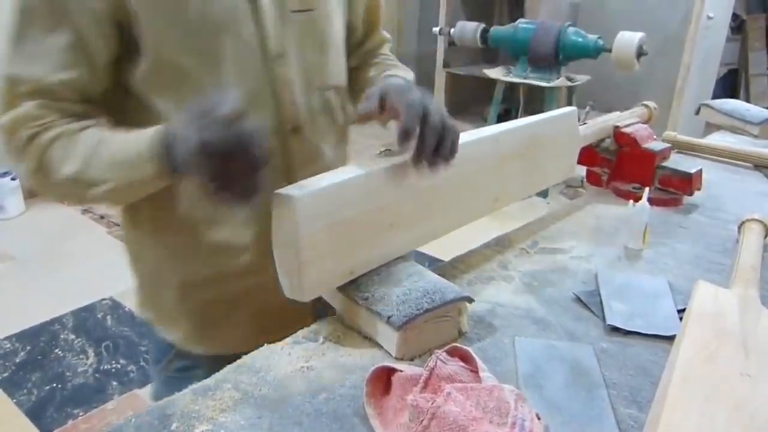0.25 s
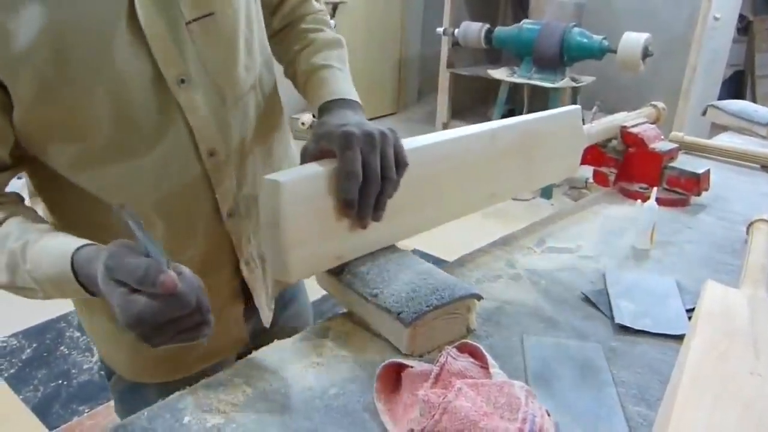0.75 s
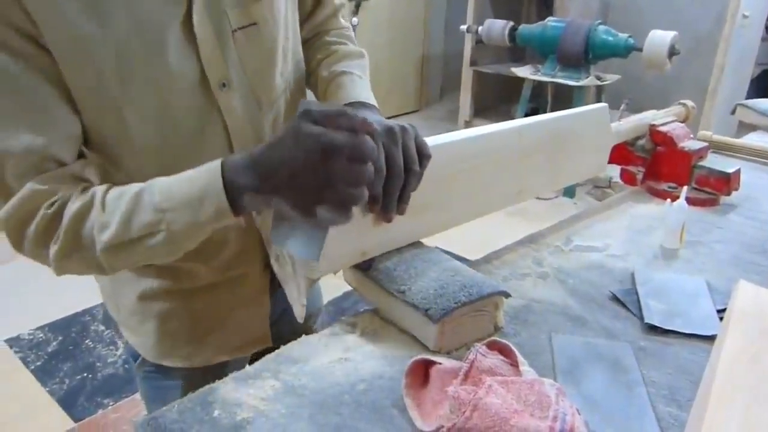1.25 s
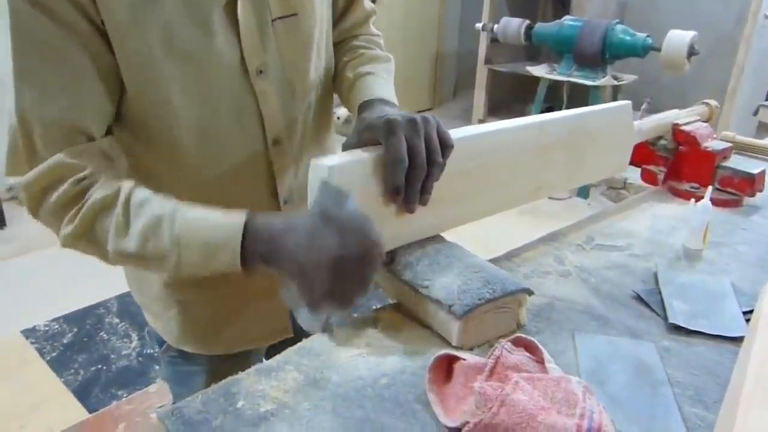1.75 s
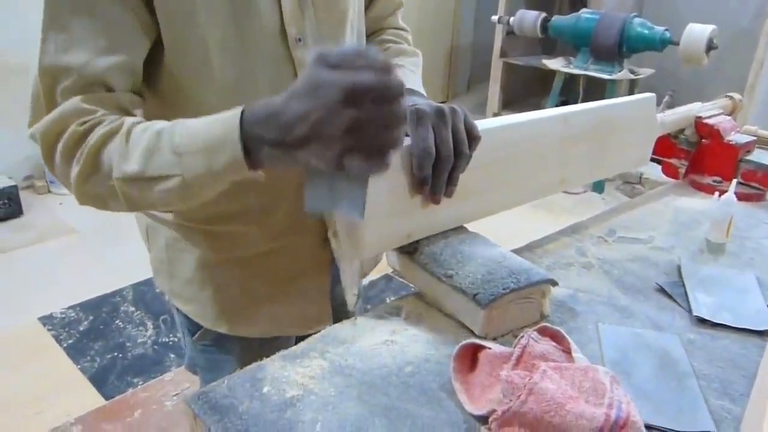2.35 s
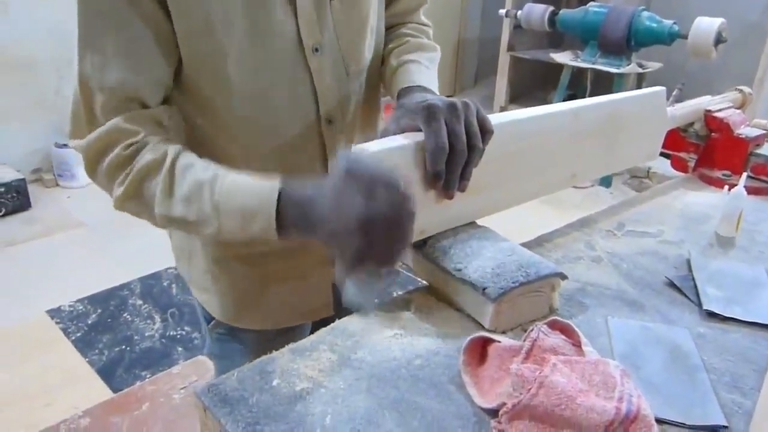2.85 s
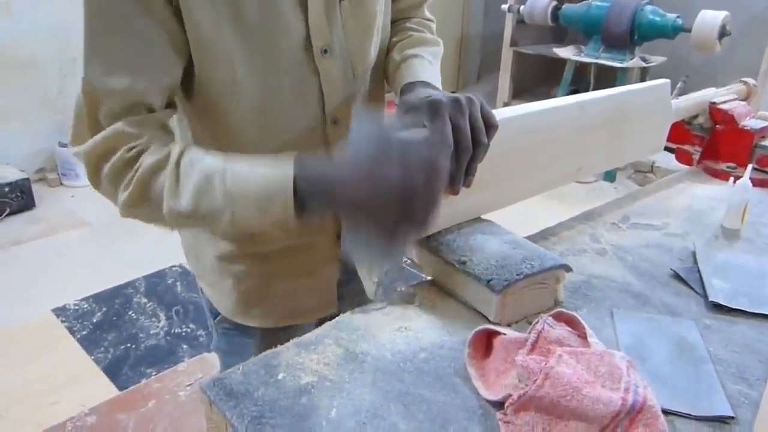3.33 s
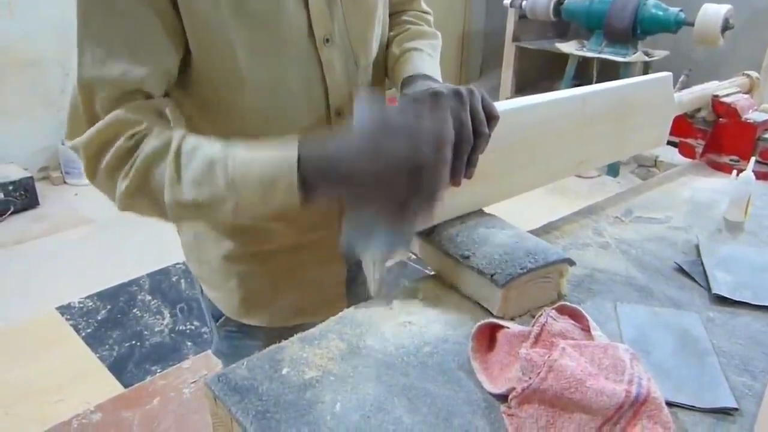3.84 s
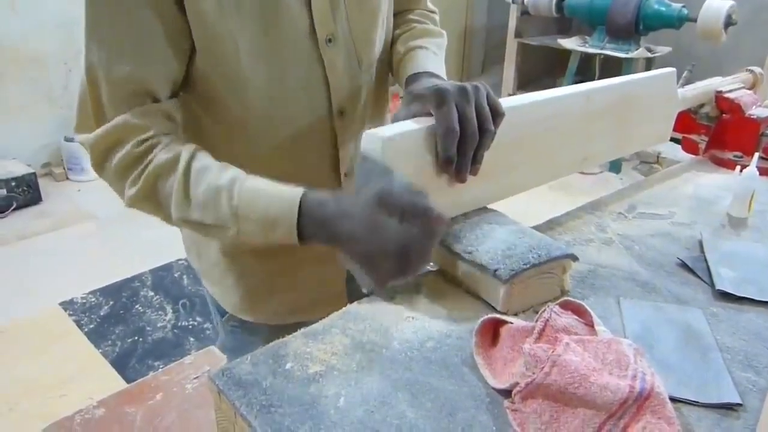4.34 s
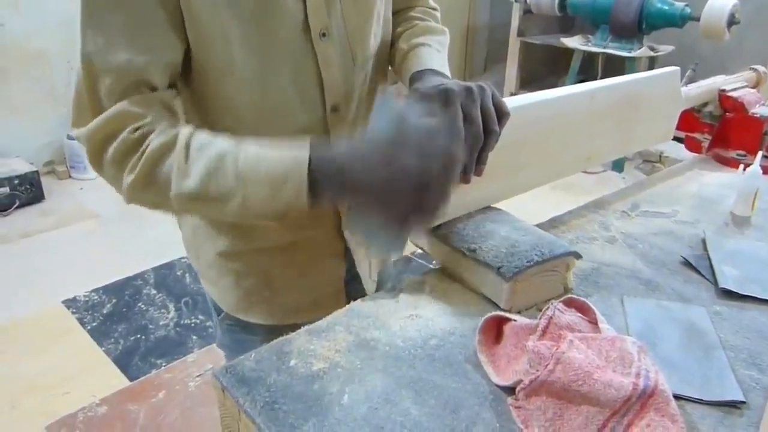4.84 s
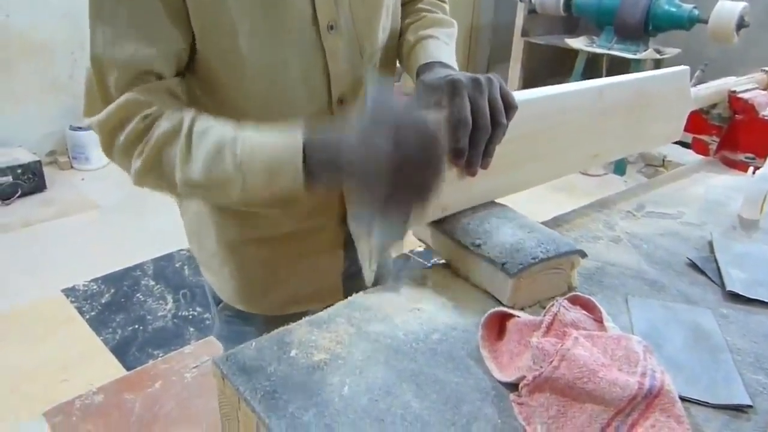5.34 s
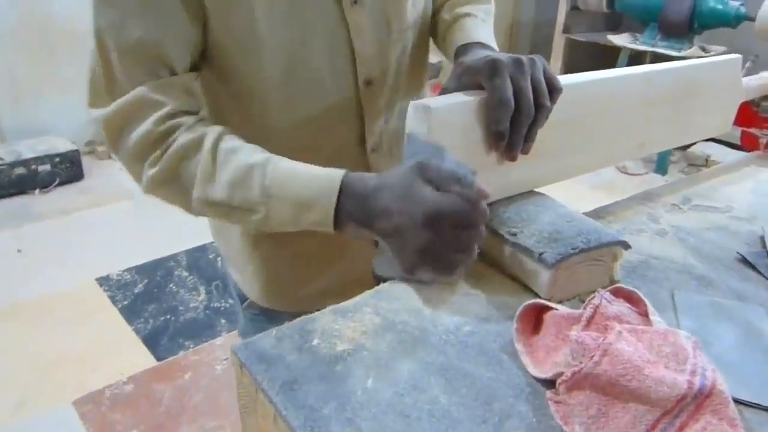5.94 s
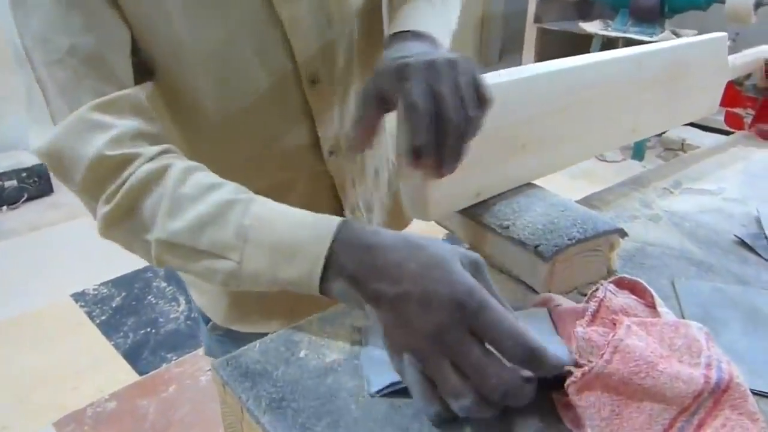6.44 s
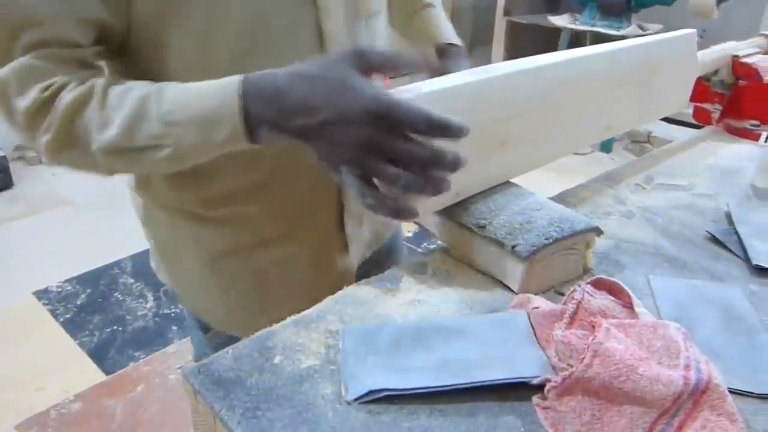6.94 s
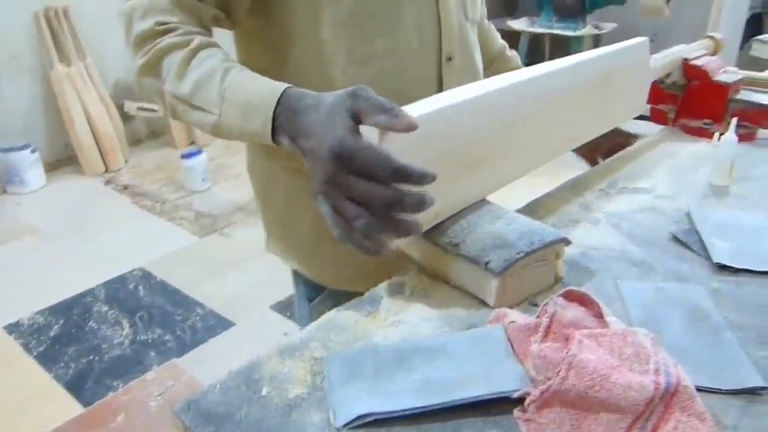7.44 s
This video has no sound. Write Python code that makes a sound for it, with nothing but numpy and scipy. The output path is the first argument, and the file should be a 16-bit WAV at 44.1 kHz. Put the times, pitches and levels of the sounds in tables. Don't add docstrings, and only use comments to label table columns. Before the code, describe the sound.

The first half second is silent, then the sound begins abruptly with sanding already under way. Until about 3.5 s, sandpaper rubs a wooden blade in rapid, uneven strokes, roughly six a second, close up: bright fine hiss with a coarser scratch, and a hollow low drone from the wood. Sharp paper snaps and creases punctuate the turns, especially at 0.6, 1.25, 1.5, 2.4 and 3.0 s. From 3.6 s the strokes are smoother, generally softer and more spaced, about five a second. A dry slat clicks down with small taps at 5.2 s. Timber is knocked further off from 5.5 s, with strong hollow clunks at 5.85 and 6.0 s and a heavy, rattling bounce around 6.3-6.5 s. Lesser knocks follow at 6.95, 7.2 and 7.5 s as rubbing continues to the end. Machine hum, faint air hiss and a wavering deep motor rumble fill the reverberant workshop.

```python
import sys
import numpy as np
from scipy import signal
from scipy.fft import rfft, irfft
from scipy.io import wavfile

SR = 44100
rng = np.random.default_rng(int(sys.argv[2]) if len(sys.argv) > 2 else 0)


def output_pcm(signal):
    pcm = np.clip(np.atleast_2d(signal).T, -1, 1) * 32767
    wavfile.write(sys.argv[1], SR, np.round(pcm).astype(np.int16))


def volts_from_db(level):
    exponent = np.asarray(level, float) / 20
    return 10 ** exponent


N = 338688
START_S = 0.4765

# pitch_hz, level_db (per Hz)
GRIT_HISS = [(1760, -29), (3000, -11.5), (5230, -2), (6490, -2.5), (8220, -1.5), (10300, -2), (14700, -17),
             (15500, -23), (15800, -26)]
# pitch_hz, level_db (per Hz)
COARSE_SCRATCH = [(900, -23.5), (1400, -3), (2000, -5.5), (2800, 0.5), (3500, -1), (5000, -18)]


def sanding():
    fine, coarse, pan_db = strokes()
    hiss = coloured(grains(per_s=14000.0, spread_db=0.0), GRIT_HISS, patchy_db=1.5)
    scratch = coloured(grains(per_s=3000.0, spread_db=2.0), COARSE_SCRATCH, patchy_db=2.5)
    both = volts_from_db(3.5) * fine * hiss + volts_from_db(-2.0) * coarse * scratch
    return both * volts_from_db(np.outer([0.5, -0.5], pan_db))


# start_s, length_s, hiss_db, swell_db (start to end), scratch_db (over the hiss)
ROUGH_END_STROKES = [(0.424, 0.22, -35.5, 11.5, -5), (0.666, 0.16, -32.5, 8, -10),
                     (0.823, 0.12, -33.5, 5, 0), (0.952, 0.15, -34.5, 3, -8),
                     (1.074, 0.18, -33.0, 14, -5.5), (1.279, 0.16, -35.5, -8, -7.0),
                     (1.438, 0.12, -33, 4, -7), (1.538, 0.17, -34.5, 11, -4), (1.727, 0.26, -38, -8, -4.5),
                     (1.892, 0.13, -34, 1, -5.5), (2.02, 0.16, -35, -2.5, -5),
                     (2.157, 0.12, -33.0, 14, -3.5), (2.316, 0.14, -33.5, 7.5, -5),
                     (2.491, 0.1, -30, 3, -7.5), (2.634, 0.118, -30.5, 18, -6.5),
                     (2.74, 0.15, -33, 5.0, -5.5), (2.887, 0.18, -32.5, 14, -7),
                     (3.11, 0.283, -32.5, -3, -9), (3.377, 0.16, -35.5, 10.5, -3)]
SMOOTH_EDGE_STROKES = [(3.577, 0.21, -31.5, 7.5, -15.0), (3.99, 0.19, -40.5, 1, -10.0),
                       (4.19, 0.17, -34.5, 2.0, -18), (4.37, 0.21, -37.5, 1, -8.5),
                       (4.59, 0.177, -38.5, -2.5, -8), (4.785, 0.2, -37.5, 9, -6),
                       (5.023, 0.18, -38, -8.0, -3.5), (5.217, 0.16, -34.5, 11, -13),
                       (5.417, 0.14, -34.5, 3.5, -8), (5.594, 0.15, -35.5, 6, -9),
                       (5.762, 0.16, -40, 10, -11), (5.946, 0.13, -38.5, -7, -9),
                       (6.111, 0.2, -31.5, 3, -9.0), (6.322, 0.18, -39, 0, -23),
                       (6.51, 0.22, -34, -2.5, -5.5), (6.743, 0.15, -36.0, -0.5, -7.5),
                       (6.921, 0.18, -32.5, 5, -4.5), (7.119, 0.16, -35, -4.0, -9),
                       (7.298, 0.18, -32.0, 3.5, -9), (7.499, 0.15, -37, -1, -8.5),
                       (7.66, 0.12, -29.5, 14, -4)]


def strokes():
    echo_t60_s, echo_share, echo_pan_db = 0.42, 1.145, 0.6
    rough_pan_db, smooth_pan_db = (1.5, -1.5), -5.0
    power = np.zeros((2, N))
    for table, rise_s, fall_s in ((ROUGH_END_STROKES, 0.028, 0.053), (SMOOTH_EDGE_STROKES, 0.032, 0.047)):
        for start_s, length_s, hiss_db, swell_db, scratch_db in table:
            shape, gone = swell(start_s, length_s, rise_s, fall_s)
            hiss = shape * volts_from_db(hiss_db + swell_db * (gone - 0.5))
            power += (hiss * volts_from_db([[0], [scratch_db]])) ** 2
    decay = volts_from_db(-120 / (echo_t60_s * SR))
    lingering = signal.lfilter([1 - decay], [1, -decay], power + 1e-12)
    total = power + echo_share * lingering

    t, smooth_from_s = np.arange(N) / SR, SMOOTH_EDGE_STROKES[0][0]
    rough_hand_db = np.interp(t, [START_S, smooth_from_s], rough_pan_db)
    hand_db = np.where(t < smooth_from_s, rough_hand_db, smooth_pan_db)
    near = power[0] / total[0]
    return *np.sqrt(total), near * hand_db + (1 - near) * echo_pan_db


# start_s, peak_db, pitch_hz, bright_edge_db (over the peak), length_s
PAPER_SNAPS = [(0.592, -9, 2600, -3, 0.015), (0.696, -18.5, 2840, -13, 0.054),
               (0.848, -26, 730, -17, 0.011), (0.902, -19, 664, -16, 0.018), (.920, -14, 1700, -17, .006),
               (1.136, -37, 710, -26, 0.011), (1.234, -13.5, 2850, -8, 0.026),
               (1.245, -10, 2470, -38, 0.016), (1.261, -24, 1150, -3, 0.034),
               (1.522, -10, 2620, -4.5, 0.018), (1.742, -29.5, 615, -29, 0.034),
               (2.125, -25, 670, -1, 0.017), (2.183, -18, 2070, -13, 0.034), (2.411, -15, 2120, -3, 0.02),
               (2.424, -18, 2860, -7, 0.034), (2.477, -21, 2120, -7, 0.037), (2.73, -19.5, 2500, -5, 0.035),
               (2.802, -21.5, 2470, -9, 0.026), (3.03, -12, 2420, -7, 0.027), (3.36, -15, 2270, -3, 0.025),
               (3.469, -19, 2300, -9, 0.034), (7.17, -14, 2820, -13, 0.0048),
               (3.128, -23, 2000, -17, 0.0093)]


def paper():
    out, t = np.zeros(N), np.arange(4000) / SR
    for start_s, peak_db, pitch_hz, edge_db, length_s in PAPER_SNAPS:
        scuff = (1 - np.exp(-t / (0.24 * length_s))) * np.exp(-3 * t / max(length_s, 0.002))
        crack = 4.04 * volts_from_db(0.49 * edge_db) * np.exp(-t / 0.00023)
        cracks = rng.standard_normal(len(t)) * rng.exponential(1, len(t)) * (scuff + crack)
        pitched = bandpass(cracks, pitch_hz / 1.26, pitch_hz * 1.304)
        pitched = pitched + 0.39 * bandpass(-cracks, pitch_hz / 2.68, pitch_hz / 1.7)
        edge = bandpass(cracks, 4000, 6000) + 0.32 * highpass(cracks, 6500, order=2)
        snap = pitched / abs(pitched).max() + volts_from_db(edge_db + 10.0) * edge / abs(edge).max()
        at = round(start_s * SR)
        out[at:at + len(t)] += volts_from_db(peak_db + 1.3) * snap
    return out


# pitch_hz, level_db (per Hz)
BLADE_BODY = [(180, -59), (300, 8), (409, -11), (480, -3.5), (589, 8.5), (803, -0.5), (1140, 0.5),
              (1950, -11.5), (2500, -15), (3250, -70), (5500, -120)]
# pitch_hz, width_hz, level_db
BLADE_TONES = [(221, 99, -26.5), (564, 67, -8.5), (125, 5.3, -15.5)]
# time_s, drone_db
HAND_PRESSURE = [(.5, -41), (1.1, -40), (1.6, -43), (2.5, -42), (3.4, -44), (3.7, -49.5), (4.0, -45),
                 (4.5, -47), (5.0, -46), (5.7, -48), (6.8, -43), (7.1, -44.5), (7.68, -47)]


def blade():
    (drone_db,), (rattle, _) = in_time(HAND_PRESSURE), rumble()
    sound = coloured(rng.standard_normal(N), BLADE_BODY, patchy_db=3.0)
    for pitch_hz, width_hz, level_db in BLADE_TONES:
        tone = ring(rng.standard_normal(N), pitch_hz, 2.2 / width_hz)
        sound = sound + volts_from_db(level_db) * rms_one(tone)
    shaken = np.hypot(volts_from_db(drone_db), rattle) * sound
    return highpass(shaken, 100, order=4)


# start_s, ring_peak_db, thud_db (over the ring), thud_hz, ring_hz
HARD_TIMBER = [
    (0.622, -40.5, 10.5, 250, 500),
    (1.189, -46.5, 16, 122.6, 910),
    (1.863, -39, 4.5, 130, 570),
    (5.806, -18.5, -5, 355.4, 770),
    (6.011, -9.5, -5.5, 206.6, 660),
    (6.311, -22, -5.5, 373, 700),
    (6.341, -20, -5.5, 179.6, 613),
    (6.371, -8.5, -9.5, 193, 482),
    (6.40, -35, -7, 133, 1250),
    (6.949, -21.5, -5.5, 195.3, 680),
]
PADDED_TIMBER = [
    (5.51, -27.5, 5.5, 310, 212),
    (5.512, -32.5, 8.5, 131.2, 700),
    (5.632, -38, 3.5, 341, 437),
    (5.849, -11, -12.5, 213, 666),
    (6.383, -13.5, -20, 320, 910),
    (6.509, -14.5, -12.5, 324.7, 870),
    (7.174, -26.5, 1, 365.8, 580),
    (7.54, -32, 0, 199, 700),
]


def knocks():
    crack_db = {"hard": 0, "padded": -18}
    rise_s = 0.0061
    out, t = np.zeros(N), np.arange(SR // 2) / SR
    crowd_hz = np.geomspace(200, 4200, 30)
    blows = [row + (crack_db["hard"],) for row in HARD_TIMBER]
    blows += [row + (crack_db["padded"],) for row in PADDED_TIMBER]
    for start_s, peak_db, thud_db, thud_hz, ring_hz, high_db in sorted(blows):
        chance = rng.standard_normal((3, len(crowd_hz) + 2))
        hz = np.append(crowd_hz * np.exp(0.024 * chance[0, 2:]), [thud_hz, ring_hz])
        slope_db = np.interp(np.log(hz), np.log([250, 460, 880, 1480]), [thud_db + 5.0, 0, 0, high_db])
        level_db = np.append(slope_db[:-2] - 13.5 + 2 * chance[1, 2:], [thud_db - 0.5, -2.5])
        t60_s = np.append(6.9 / crowd_hz ** 0.76, [0.22, 21.0 / ring_hz])[:, None]
        since = np.maximum(t - 0.00138 * abs(chance[2])[:, None], 0)
        build_up = 1 - np.exp(-since * (hz[:, None] / 200) ** 2 / rise_s)
        modes = np.sin(2 * np.pi * hz[:, None] * since) * build_up * volts_from_db(1.0 - 60 * since / t60_s)
        blow = volts_from_db(level_db) @ modes
        at = round(start_s * SR)
        out[at:at + len(t)] += volts_from_db(peak_db) * blow[:N - at]
    return highpass(out, 112, order=6)


# start_s, peak_db
TAPS = [
    (5.173, -19),
    (5.194, -26.5),
    (5.234, -28),
]
# pitch_hz, level_db, t60_s (time to fall 60 dB)
SLAT_MODES = [(362, -3.5, 0.034), (490, -14, 0.045), (615, -6, 0.12), (700, -0.5, 0.026), (910, -3.5, .03),
              (1250, -4.5, .02), (1540, -1.5, .02), (2000, -3, 0.022), (2600, -13, 0.01), (2900, -1, 0.016),
              (3460, -2, 0.01)]


def slat():
    t, chatter_s = np.arange(N) / SR, 0.011
    force = np.zeros(N)
    for start_s, peak_db in TAPS:
        force += volts_from_db(peak_db - 25.0) * (t >= start_s) * np.exp(-np.maximum(t - start_s, 0) / chatter_s)
    body = np.zeros(N)
    for pitch_hz, level_db, t60_s in SLAT_MODES:
        contacts = force * grains(per_s=2100.0, spread_db=3.5)
        body += volts_from_db(level_db) * ring(contacts, pitch_hz, t60_s)
    return highpass(body, 280, order=2)


# start_s, length_s, body_db, boom_db
TIMBER_RUMBLES = [
    (5.796, 0.2, -37.5, -35),
    (5.97, 0.47, -41, -36),
    (6.384, 0.28, -29.5, -53),
    (6.555, 0.22, -43, -33.5),
]


def rumble():
    power = np.zeros((2, N))
    for start_s, length_s, body_db, boom_db in TIMBER_RUMBLES:
        shape, _ = swell(start_s, length_s, rise=0.017, fall=0.13)
        power += (shape * volts_from_db([[body_db], [boom_db]])) ** 2
    return np.sqrt(power)


# pitch_hz, level_db (per Hz)
LOOSE_BUZZ = [(700, -8), (1000, 5), (1500, -2), (2200, -4), (3000, -24)]


def loose_pieces():
    rattle, _ = rumble()
    return volts_from_db(-4) * rattle * coloured(grains(per_s=1300.0, spread_db=4.5), LOOSE_BUZZ, patchy_db=2.0)


# pitch_hz, level_db (per Hz)
MACHINE_HUM = [(59, -52), (100, 0), (124, 16.5), (156, -10), (199, 12.5), (253, 6), (274, -18.5),
               (340, -1.5), (400, 19), (520, -48), (880, -120)]


def machine_hum():
    (drone_db,), (_, boom) = in_time(HAND_PRESSURE), rumble()
    hum_db = -49 + 0.76 * (drone_db - drone_db.mean())
    hum = coloured(rng.standard_normal(N), MACHINE_HUM, patchy_db=2.5)
    return highpass(np.hypot(volts_from_db(hum_db), boom) * hum, 100, order=4)


# pitch_hz, level_db (per Hz)
MOTOR_RUMBLE = [(20, -41), (40, -16), (60, -19), (82, -7), (110, -1)]
# time_s, level_db
MOTOR_LEVEL = [(.5, -55), (1.9, -58), (2.4, -67), (2.7, -56), (3.4, -57), (3.8, -54.5), (5.5, -52),
               (6.3, -50), (6.6, -46), (7.1, -53), (7.6, -51)]


def far_motor():
    level_db, = in_time(MOTOR_LEVEL)
    return volts_from_db(level_db - 2.5) * coloured(rng.standard_normal(N), MOTOR_RUMBLE, patchy_db=3.5)


# pitch_hz, level_db (per Hz)
FAR_HISS = [(880, -35), (1500, 8), (1620, -5), (1700, 9), (2380, -4), (3900, 1), (10000, -20), (15800, -32)]


def shop_air():
    return volts_from_db(-47.5) * coloured(rng.standard_normal(N), FAR_HISS, patchy_db=2.5)


# pitch_hz, t60_s
SHOP_RING = [(100, 1.29), (500, 0.58), (1500, 0.86), (4000, 0.61), (10000, 0.37)]


def shop(x):
    t, edges = np.arange(SR * 3 // 2) / SR, 100 * 2 ** np.arange(0, 7.1, 0.5)
    white, tail = rng.standard_normal((2, len(t))), 0
    for low, high in zip(edges, edges[1:]):
        hz = np.sqrt(low * high)
        mid, side = bandpass(white, low, high)
        alike = np.clip(at_hz(PORT_LIKENESS, hz), 0, 1)
        both = np.sqrt(1 + alike) * mid + np.sqrt(1 - alike) * side * [[1], [-1]]
        tail = -tail + both * volts_from_db(-60 * t / at_hz(SHOP_RING, hz))
    tail = tail * (1 - np.exp(-t / 0.0016)) / np.sqrt(np.sum(tail ** 2) / 2)
    return signal.fftconvolve(tail, x[None], axes=1)[:, :N]


# pitch_hz, lead_radians
LEAD_AT_FIRST = [(0, 0), (4500, -.1), (9000, -1.2), (12500, -2.2), (16000, -2.4)]
LEAD_LATER = [(0, 0), (2000, -.1), (4500, -.6), (9000, -1.9), (12500, -2.7), (16000, -2.7)]


def left_port(x):
    hz, spectrum, turned = np.fft.rfftfreq(N, 1 / SR), rfft(x), []
    for lead in (LEAD_AT_FIRST, LEAD_LATER):
        phase = np.interp(hz, *np.transpose(lead))
        turned.append(irfft(spectrum * np.exp(1j * phase), N))
    return np.where(np.arange(N) < 2.9 * SR, *turned)


# pitch_hz, likeness (0 to 1)
PORT_LIKENESS = [(30, 0.85), (120, 1), (500, 0.97), (1000, 0.9), (2000, 0.62), (4000, 0.42), (8000, 0.51),
                 (14000, 0.23)]


def coloured(direct, spectrum, patchy_db):
    near, diffuse = np.array([left_port(direct), direct]), rng.standard_normal((2, N))
    out, together = 0, drift(7.8)
    lowest, highest = spectrum[0][0], spectrum[-1][0]
    edges = lowest * 2 ** np.arange(0, np.log2(highest / lowest) + 0.2, 1 / 3)
    for k, (low, high) in enumerate(zip(edges, edges[1:])):
        hz = np.sqrt(low * high)
        alike = np.clip(at_hz(PORT_LIKENESS, hz), 0, 1)
        band = bandpass(np.sqrt(alike) * near + np.sqrt(1 - alike) * diffuse, low, high)
        patches = 0.5 * together + drift(20.5) + 0.72 * drift(3.0)
        out = out + (-1) ** k * volts_from_db(at_hz(spectrum, hz) + patchy_db * patches) * band
    return rms_one(out)


def swell(start, length, rise, fall):
    since = np.arange(N) / SR - start
    ramp = np.clip(np.minimum(since / rise, (length - since) / fall), 0, 1)
    return np.sin(np.pi / 2 * ramp), np.clip(since / length, 0, 1)


def grains(per_s, spread_db):
    sizes = volts_from_db(spread_db * np.minimum(rng.exponential(1, N), 5)) * rng.choice([-1, 1], N)
    return rms_one(sizes * (rng.random(N) < per_s / SR))


def ring(x, hz, t60):
    r, w = volts_from_db(-60 / (t60 * SR)), 2 * np.pi * hz / SR
    return signal.lfilter([0, np.sin(w)], [1, -2 * r * np.cos(w), r * r], x + 1e-18)


def drift(rate):
    r = np.exp(-80 * np.pi * rate / SR)
    slow = signal.lfilter([1], [1, -2 * r, r * r], rng.standard_normal(N // 40 + 2002))[2000:]
    return np.interp(np.arange(N) / 40, np.arange(len(slow)), rms_one(slow))


def bandpass(x, low, high):
    return signal.sosfilt(signal.butter(2, [low, high], "band", fs=SR, output="sos"), x)


def highpass(x, hz, order):
    return signal.sosfilt(signal.butter(order, hz, "high", fs=SR, output="sos"), x)


def rms_one(x):
    return x / np.sqrt(np.mean(x ** 2) + 1e-20)


def in_time(rows):
    s, *columns = np.transpose(rows)
    return [np.interp(np.arange(N) / SR, s, c) for c in columns]


def at_hz(points, hz):
    table_hz, values = np.transpose(points)
    return np.interp(np.log(hz), np.log(table_hz), values)


def scene():
    snaps, blows = paper(), knocks() + slat()
    near = sanding() + np.array([left_port(snaps), snaps]) + blade()
    far = blows * volts_from_db(0) * volts_from_db([[-0.4], [0.4]]) + loose_pieces()
    background = machine_hum() + far_motor() + shop_air()
    return near + far + background + shop(volts_from_db(-7.5) * snaps + volts_from_db(-2.5) * blows)


def low_pass(x):
    return signal.sosfilt(signal.butter(12, 16370, fs=SR, output="sos"), x)


def record(dry):
    on = np.clip((np.arange(N) / SR - START_S) / 0.00023, 0, 1)
    heard = dry + volts_from_db(-58) * rng.standard_normal(dry.shape)
    rounded = 1.3 * np.tanh(heard / 1.3) * on
    finished = signal.sosfilt(signal.cheby2(18, 50, 15800, fs=SR, output="sos"), rounded)
    return low_pass(finished)


dry = scene()
out = record(dry)
output_pcm(out)
```